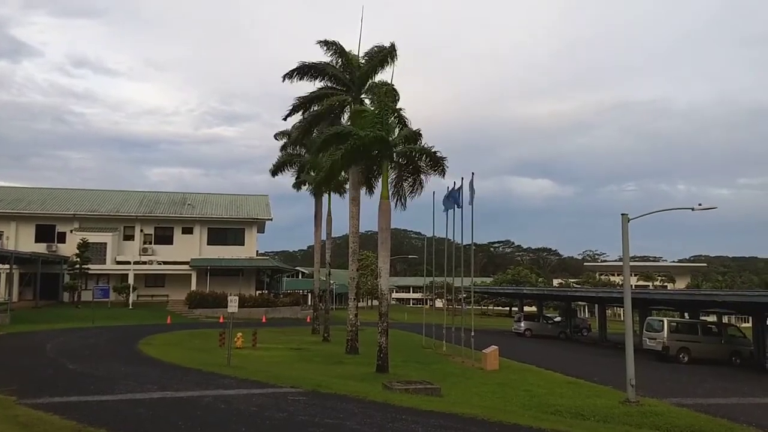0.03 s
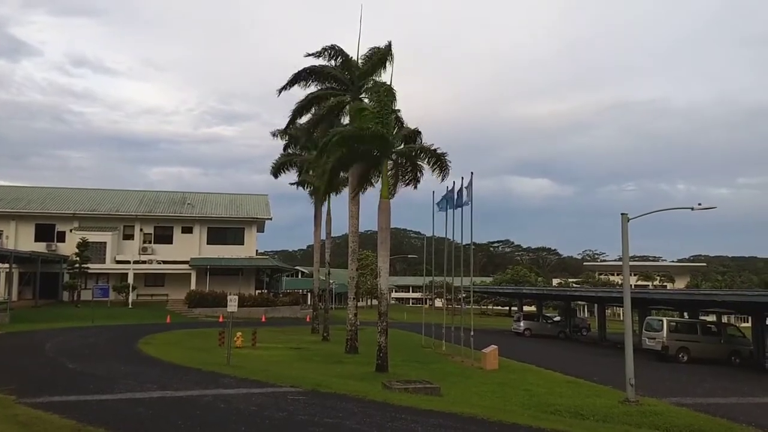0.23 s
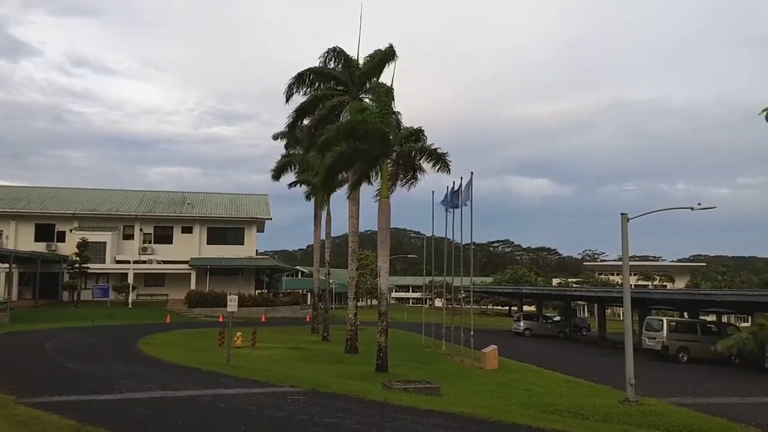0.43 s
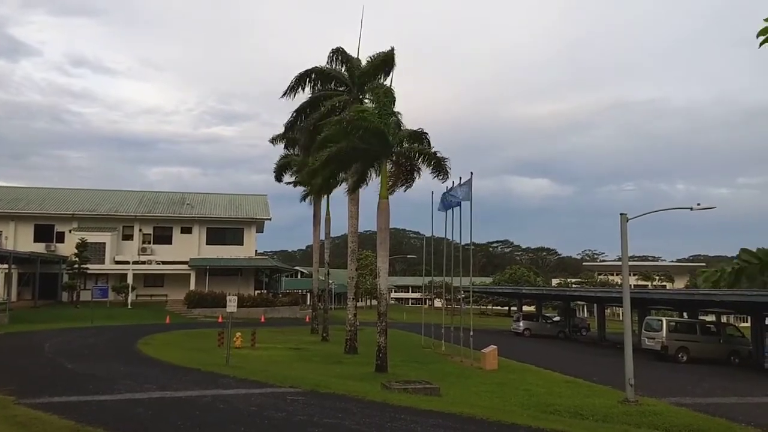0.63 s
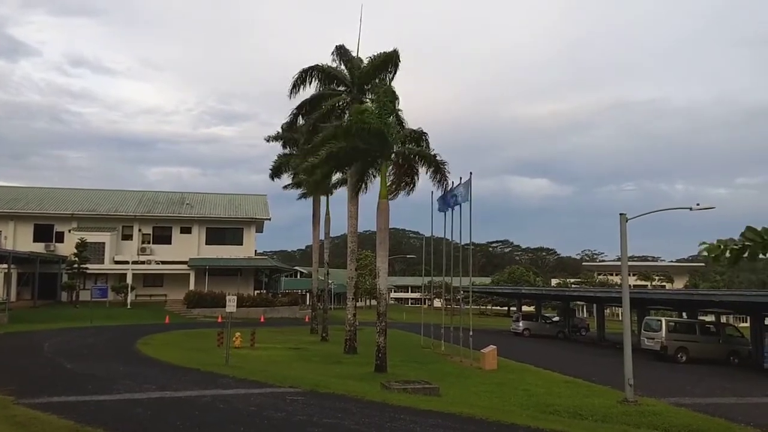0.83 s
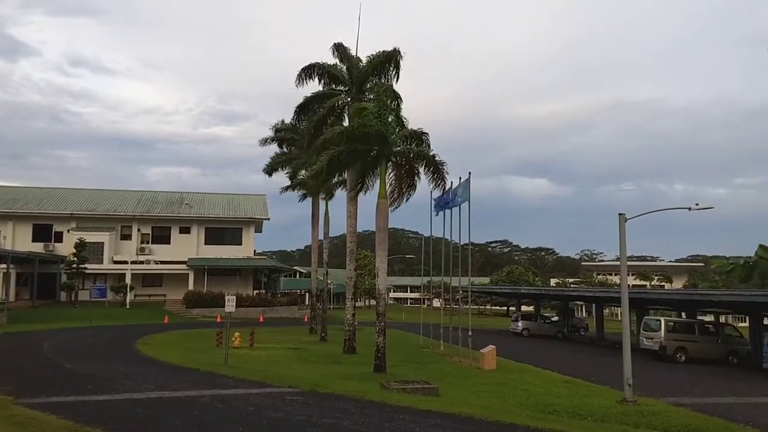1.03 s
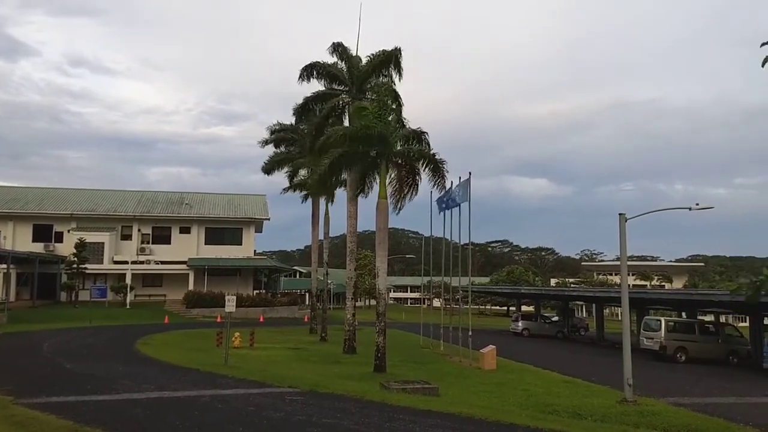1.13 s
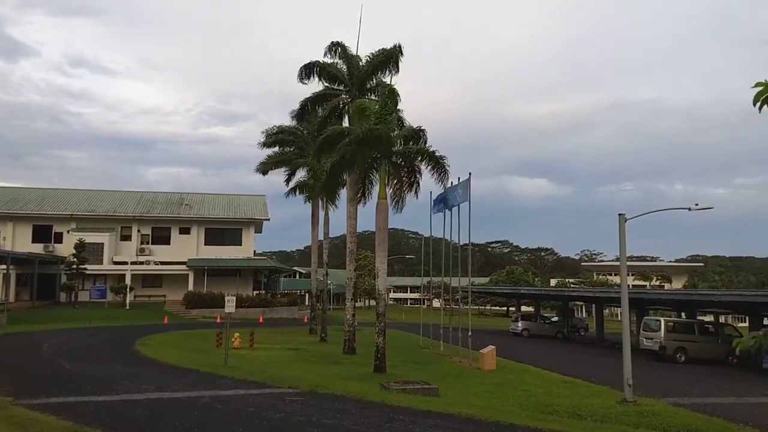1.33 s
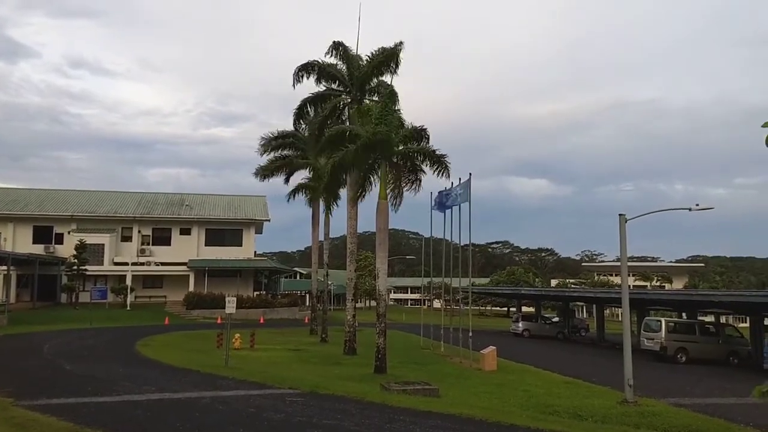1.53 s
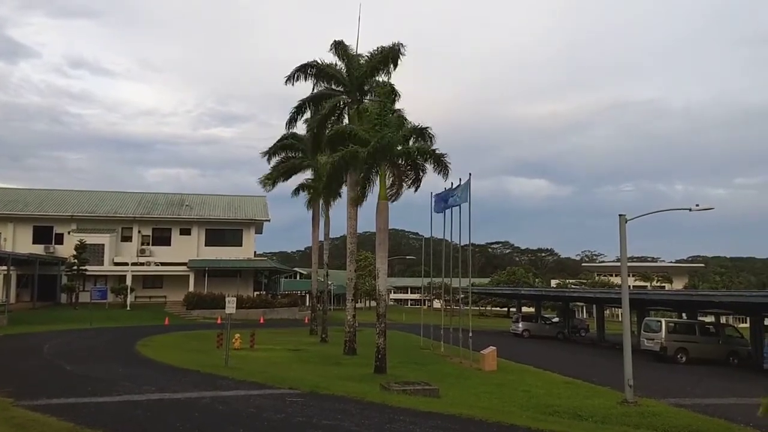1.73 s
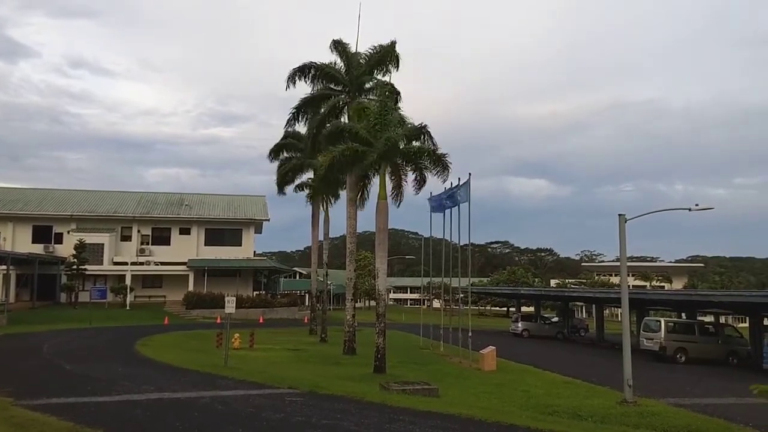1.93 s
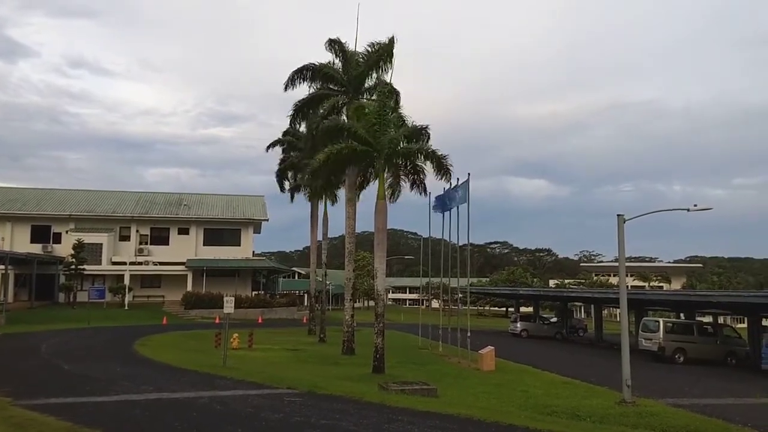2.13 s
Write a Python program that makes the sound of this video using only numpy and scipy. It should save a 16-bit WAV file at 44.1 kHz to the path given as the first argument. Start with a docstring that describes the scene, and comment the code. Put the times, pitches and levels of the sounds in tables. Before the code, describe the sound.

Wind rumbles and thumps on the microphone over rustling palms and faint distant bird chirps.

```python
"""Under palm trees in a gusty wind, with a two-port stereo microphone. From the start fronds hiss and
patter while eddies buffet the ports with short low rumbles, the hard ones reaching higher in pitch.
From 0.3 s small birds call far off and a few fronds slap; from 0.5 s vortex cores thump the ports.
After 1 s the trees ease, but the microphone is hit hard until 1.9 s. Throughout, the recorder widens
the stereo image by subtracting a late copy of each port from the other."""
import sys
import numpy as np
from scipy import signal
from scipy.fft import rfft, irfft
from scipy.io import wavfile
from scipy.ndimage import uniform_filter1d

SR = 44100
rng = np.random.default_rng(int(sys.argv[2]) if len(sys.argv) > 2 else 0)


def unload_wav(signal):
    """Save mono or channel-first audio to the path in sys.argv[1] as 16-bit WAV at rate SR, clipped to [-1, 1]."""
    wavfile.write(
        sys.argv[1],
        SR,
        np.round(np.clip(np.atleast_2d(signal).T, -1, 1) * 32767).astype(np.int16),
    )


N = 97020
TIME = np.arange(N) / SR
BIN_HZ = np.maximum(np.fft.rfftfreq(N, 1 / SR), 1)


def undb(db):
    """Decibels to gain."""
    return 10 ** (np.asarray(db) / 20)


def unit(x):
    """Scale each channel to rms 1."""
    return x / np.sqrt(np.mean(x ** 2, axis=-1, keepdims=True) + 1e-20)


def walk(rate_hz):
    """Random levels held 1 / rate_hz seconds and smoothed twice; rms 1."""
    hold = int(SR / rate_hz)
    steps = np.repeat(rng.standard_normal(N // hold + 1), hold)
    return unit(uniform_filter1d(uniform_filter1d(steps, hold), hold)[:N])


def colour(x, spectrum):
    """Filter by a spectrum of (f/Hz, level/dB) points; rms 1."""
    hz, db = np.array(spectrum).T
    gain = undb(np.interp(np.log(BIN_HZ), np.log(hz), db))
    return unit(irfft(rfft(x) * gain, N))


def diffuse(port_gap_m=0.13):
    """Noise from all around the microphone: alike at both ports only for waves longer than their gap."""
    alike = np.sinc(2 * BIN_HZ * port_gap_m / 343)
    mid, side = rfft(rng.standard_normal((2, N))) * np.sqrt([1 + alike, 1 - alike])
    return unit(irfft(np.array([mid + side, mid - side]), N))


def port_cut(x, corner_hz=67.3):
    """The microphone ports pass no deep bass."""
    return signal.sosfilt(signal.butter(4, corner_hz, "high", fs=SR, output="sos"), x)


def turbulence(corner_hz, order=4.1):
    """Pressure of the flow, unrelated at the two ports, falling steeply above its corner."""
    corners = corner_hz * np.array([[0.82], [1]])  # the left port is more sheltered, so duller
    rolloff = (1 + (BIN_HZ / corners) ** 2) ** (-order / 2)
    return unit(irfft(rfft(rng.standard_normal((2, N))) * rolloff, N))


def port_rumble(level_db=-29.5, waver_db=3.5):
    """Right on the microphone, the flow between the eddies makes a wavering rumble."""
    flow = unit(port_cut(turbulence(corner_hz=171)))
    return flow * undb(level_db + waver_db * np.array([walk(30.47), walk(32.4)]))


# wind in the palms, heard from the ground: t/s, hiss level/dB, rush level/dB
PALM_WIND = [(0, -46.5, -43.5), (.26, -43, -37), (.31, -41, -39.5), (.55, -42, -37.5), (.78, -40.5, -36.5),
             (.83, -45.5, -43), (1.02, -44, -38.5), (1.07, -48, -44.5), (1.18, -47.5, -46),
             (1.27, -45.5, -44), (1.4, -46, -41.5), (1.52, -52.5, -48), (1.67, -51.5, -45.5),
             (2.02, -52.5, -51), (2.2, -50, -48)]
# spectrum of the fronds: f/Hz, relative level/dB
FROND_SPECTRUM = [(800, -14.5), (1600, -1.5), (2600, -2.5), (3500, 1), (4600, -2), (6800, -4), (9000, -7.3),
                  (10200, -12), (12800, -16), (15500, -15)]
FROND_BALANCE_DB = [[-1.3], [1.3]]  # left, right


def frond_hiss(ticks_per_s=230, tick_decay_s=0.0009, patter_db=-16.5):
    """Leaflets around the microphone hiss and patter, rising and falling with the wind."""
    times, hiss_db, _ = np.array(PALM_WIND).T
    hits = rng.random(N) < ticks_per_s / SR
    ticks = hits * undb(-2 * np.minimum(rng.exponential(size=N), 4))  # spread over 8 dB
    decays = signal.lfilter([1], [1, -np.exp(-1 / (tick_decay_s * SR))], ticks)
    patter = unit(diffuse() * decays)
    leaflets = colour(diffuse() + undb(patter_db) * patter, FROND_SPECTRUM)
    level_db = np.interp(TIME, times, hiss_db) + 0.33 * walk(16.35) + 0.5 * walk(60.33)  # waver, flicker
    return leaflets * undb(level_db) * undb(FROND_BALANCE_DB)


# spectrum of the wind in the crowns: f/Hz, relative level/dB
CROWN_SPECTRUM = [(55, 11), (100, 2.5), (200, -8), (500, -4.5), (900, -7.5), (1500, -13), (2300, -13),
                  (4000, -22.5), (9000, -32)]


def crown_rush():
    """Wind through the crowns makes a low rush under the hiss, louder at the right port."""
    times, _, rush_db = np.array(PALM_WIND).T
    rush = colour(diffuse(), CROWN_SPECTRUM)
    return rush * undb(np.interp(TIME, times, rush_db)) * undb([[-2], [2]])


# eddies on the microphone: middle t/s, length/s, left level/dB, right level/dB, right corner f/Hz
EDDIES = [(0.022, 0.023, -23, -40, 135), (0.171, 0.1, -34, -26.5, 130), (0.21, 0.0081, -22.5, -15.5, 202),
          (0.336, 0.02, -20, -20.5, 130), (0.426, 0.023, -31, -18.5, 186), (0.481, 0.032, -26, -14.5, 211),
          (0.548, 0.044, -27, -18.5, 197), (0.573, 0.027, -30, -15.5, 214), (0.611, 0.032, -27, -18.5, 213),
          (0.644, 0.02, -13, -30, 209), (0.707, 0.036, -18, -15, 194), (0.744, 0.03, -23, -14.5, 182),
          (0.792, 0.021, -17.5, -8.5, 220), (0.857, 0.023, -18, -21, 344),
          (0.937, 0.038, -20.5, -19.5, 206), (0.994, 0.08, -20.5, -26, 171),
          (1.031, 0.029, -19.5, -15, 320), (1.124, 0.035, -20, -46, 224), (1.187, 0.025, -14.5, -18, 293),
          (1.218, 0.015, -14.5, -32, 189), (1.309, 0.047, -15.5, -17, 283),
          (1.345, 0.041, -22.5, -16.5, 330), (1.426, 0.017, -14, -13.5, 245),
          (1.464, 0.045, -17.5, -10.5, 270), (1.513, 0.062, -25, -10.5, 350), (1.582, 0.054, -31, -19, 262),
          (1.657, 0.032, -19.5, -13.5, 347), (1.696, 0.037, -29, -18.5, 287), (1.823, 0.024, -20, -10, 445),
          (1.867, 0.053, -10, -14, 295), (1.908, 0.025, -21, -25.5, 524), (2.005, 0.073, -27, -22, 221),
          (2.171, 0.062, -25, -24.5, 197)]


def eddy_buffets(edge_s=0.0039, flutter_db=2.2):
    """Each eddy that hits the ports is a ragged burst of turbulence."""
    flutter = undb(flutter_db * walk(220))
    out = 0
    for middle, length, left_db, right_db, corner_hz in EDDIES:
        gate = .5 + .5 * np.tanh((length / 2 - abs(TIME - middle)) / (2 * edge_s))
        burst = port_cut(turbulence(corner_hz) * gate * flutter)
        burst = unit(burst) * np.sqrt(length * SR / N)  # rms about 1 over its own length
        out += burst * undb([[left_db], [right_db]])
    return out


# distant bird notes: start t/s, length/s, f/Hz, level/dB, left minus right/dB
BIRD_NOTES = [(0.298, 0.022, 7540, -42.5, 1), (0.351, 0.039, 7500, -48, -4), (.40, 0.04, 7580, -55, 2),
              (0.721, 0.03, 7460, -49, 2), (0.815, 0.01, 8170, -51, 4), (1.015, 0.017, 7520, -45, 0),
              (1.156, 0.021, 7410, -50.5, -8), (1.556, 0.031, 7600, -61, 4), (1.191, 0.049, 2670, -55, 15),
              (1.254, 0.095, 2680, -65, 13), (1.573, 0.079, 2675, -60, 9), (2.089, 0.027, 2930, -65, 19)]


def far_birds(fall=0.025, waver=0.0078, echo_db=1.5, echo_t60_s=0.89):
    """Far off, thin chips and lower whistles drop onto their pitch, echoed by trees and buildings."""
    calls = 0
    for start, length, hz, db, pan_db in BIRD_NOTES:
        progress = np.clip((TIME - start) / length, 0, 1)
        pitch = hz * (1 + fall * (1 - progress) ** 4 + waver * walk(300))
        envelope = np.sqrt(8 * progress * (1 - progress))
        note = envelope * np.sin(2 * np.pi * np.cumsum(pitch) / SR)
        calls += note * undb([[db + pan_db / 2], [db - pan_db / 2]])
    decay = undb(-60 * TIME / echo_t60_s)
    tail = unit(rng.standard_normal((2, N)) * decay) / np.sqrt(N)
    return calls + undb(echo_db) * signal.fftconvolve(calls, tail, axes=1)[:, :N]


# slaps up in the palms: t/s, level/dB
FROND_SLAPS = [(0.304, -40), (0.476, -42), (.78, -40), (1.021, -44)]


def frond_slaps(length_s=0.0091):
    """Fronds slap together in brief bursts of the same colour as their hiss."""
    envelope = sum(undb(db) * np.exp(-(2 * (TIME - at) / length_s) ** 2) for at, db in FROND_SLAPS)
    return colour(diffuse(), FROND_SPECTRUM) * envelope * undb(FROND_BALANCE_DB)


# vortex cores on the microphone, peaks before the bass cut: t/s, left level/dB, right level/dB, width/s
VORTEX_CORES = [(0.485, -40, -8.5, 0.0014), (0.657, -6, -30, 0.0014), (0.802, -7, -40, 0.0014),
                (0.855, -15.5, -39, 0.00068), (1.031, -47, -10, 0.00061), (1.306, -13, -36, .0011),
                (1.331, -30, -7, 0.0014), (1.348, -35, -12.5, 0.00057), (1.432, -18, -5, 0.0016),
                (1.458, -27, -9.5, 0.00061), (1.479, -32, -25, 0.00019), (1.492, -15, -9.5, 0.0004),
                (1.519, -39, -4, 0.00074), (1.69, -25, -2.5, 0.0013), (1.776, -49, -3.5, 0.00084),
                (1.813, -37, -6.5, 0.00057), (1.835, -33, -8.5, 0.0009), (1.857, -12, -29, 0.0012),
                (1.883, -1, -13, 0.00099), (1.902, -25.5, -33, 0.00025)]


def vortex_thumps():
    """Each vortex core thumps the ports with a push, then a pull; the wider, the deeper."""
    pressure = 0
    for at, left_db, right_db, width in VORTEX_CORES:
        widths_past = (TIME - at) / width
        swing = -widths_past * np.exp(-widths_past ** 2 / 2)
        pressure += swing / swing.max() * undb([[left_db], [right_db]])
    return port_cut(pressure)


def scene():
    """Left and right ports, near to far: wind on the microphone, the palms, the birds."""
    port_wind = port_rumble() + eddy_buffets() + vortex_thumps()
    palms = frond_hiss() + frond_slaps() + crown_rush()
    return port_wind + palms + far_birds()


# the recorder's stereo widening: f/Hz, share of the other port that is subtracted
CROSSFEED = [(100, 0.82), (1100, 0.52), (2300, 1), (3500, 0.57), (4650, 0.7), (5800, 0.58), (7000, 0.47),
             (11500, 1)]


def record(dry, lag_s=19 / SR, ceiling=0.95, top_hz=15400):
    """The recorder subtracts a late copy of the other port, rounds the highest peaks and cuts the top."""
    f = np.fft.rfftfreq(2 * N, 1 / SR)
    hz, share = np.array(CROSSFEED).T
    ports = rfft(dry, 2 * N)
    late_share = np.interp(f, hz, share) * np.exp(-2j * np.pi * f * lag_s)
    wide = irfft(ports - late_share * ports[::-1], 2 * N)[:, :N]
    rounded = wide / (1 + (wide / ceiling) ** 6) ** (1 / 6)
    return signal.sosfilt(signal.ellip(10, .2, 80, top_hz, fs=SR, output="sos"), rounded)


dry = scene()
out = record(dry)
unload_wav(out)
```